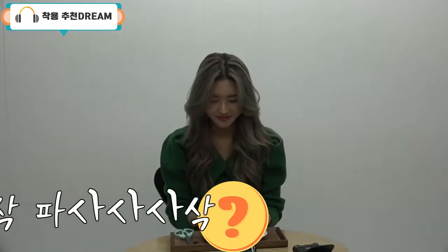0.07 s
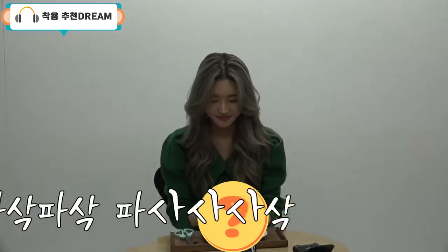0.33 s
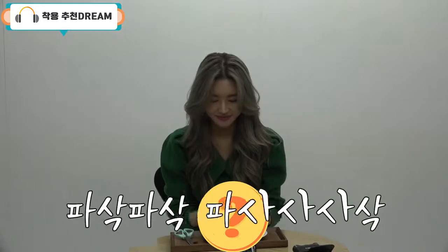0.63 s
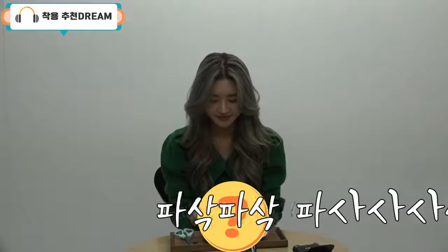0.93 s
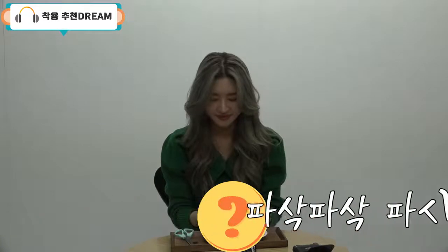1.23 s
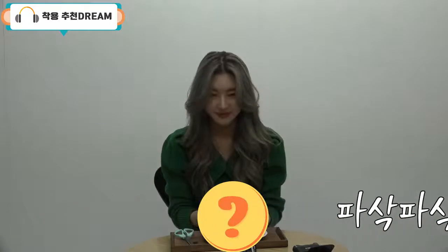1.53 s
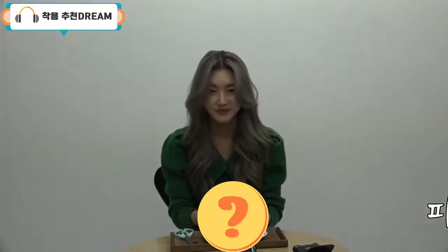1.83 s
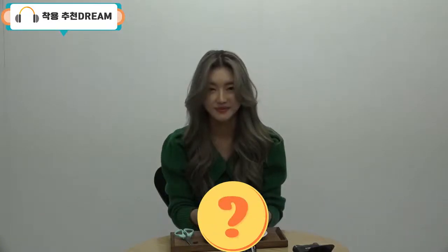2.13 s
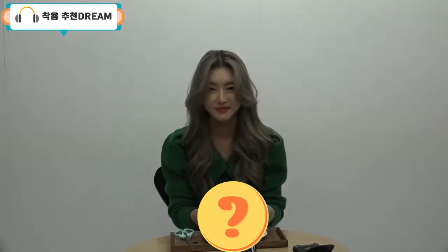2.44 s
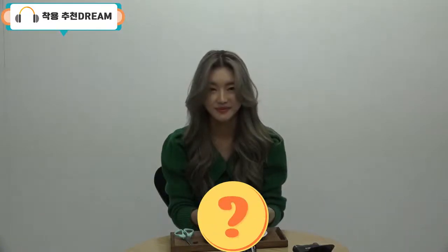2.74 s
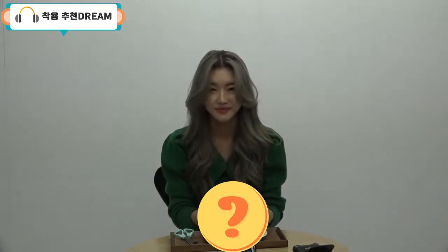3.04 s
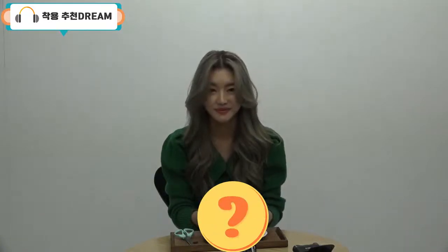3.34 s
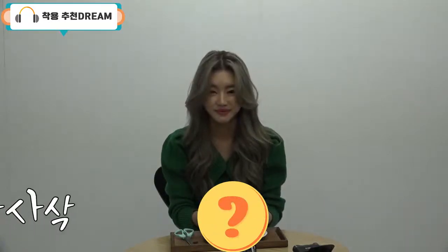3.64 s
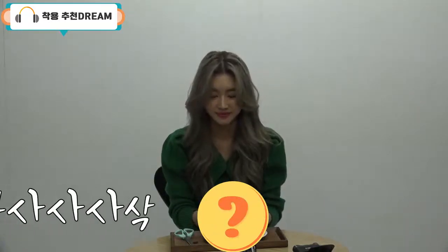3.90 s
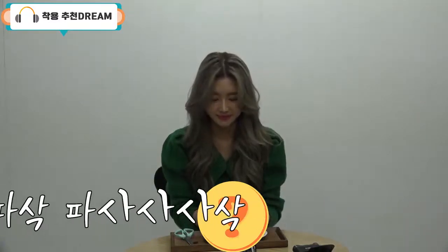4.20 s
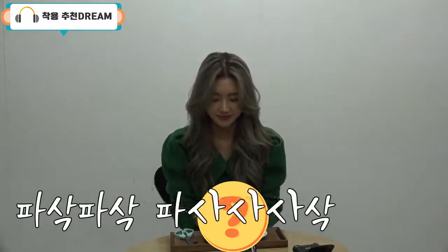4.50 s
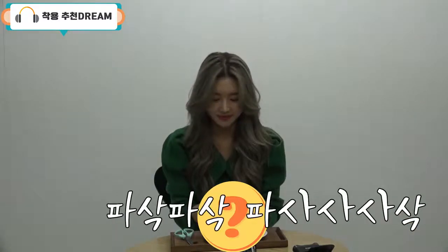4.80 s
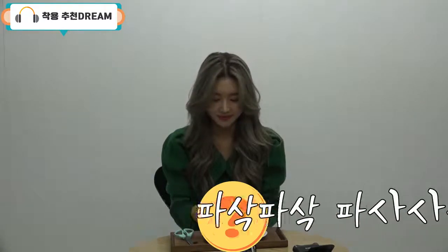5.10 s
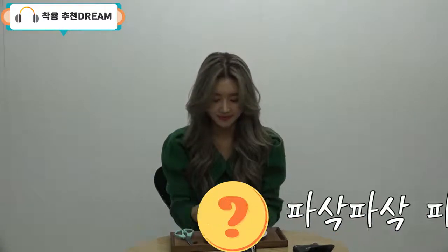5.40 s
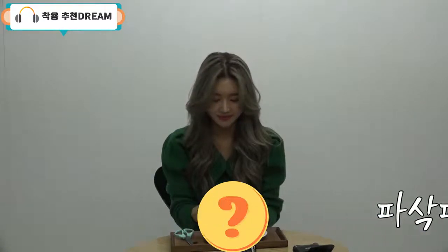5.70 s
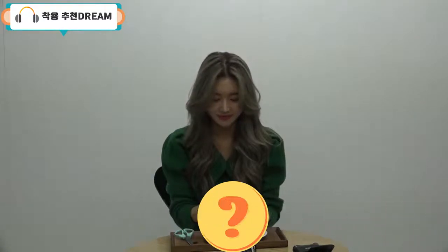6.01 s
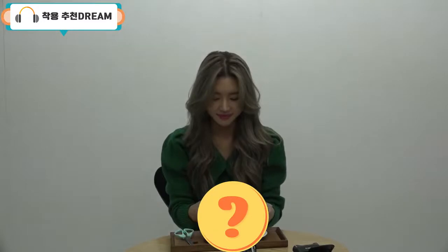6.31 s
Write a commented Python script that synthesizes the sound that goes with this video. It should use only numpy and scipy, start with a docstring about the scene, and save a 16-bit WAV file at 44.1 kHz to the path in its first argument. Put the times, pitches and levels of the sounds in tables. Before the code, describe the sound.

Close to a stereo microphone in a small quiet room, brittle seaweed crackles and snaps as fingers squeeze it again and again. The crunch is busiest at first, eases a little, then picks up again before growing sparser. Beneath it are a soft handling rumble, one faint scuff of a wooden tray on the table early on, and a few low knocks against the tray around the middle.

```python
"""Crushing dry seaweed over a tray

A small quiet room, a stereo microphone close to two hands crushing seaweed sheets over a wooden tray.
Every squeeze breaks thousands of tiny flakes while the sheets rub over each other; bigger fractures
snap out and flex the sheet around them. Hands and sleeves rumble softly as they shift.
Now and then the hands bump the tray and set it ringing, and once it scuffs on the table."""
import sys
import numpy as np
from scipy import signal
from scipy.fft import rfft, irfft
from scipy.io import wavfile
from scipy.ndimage import uniform_filter1d

SR = 44100
rng = np.random.default_rng(int(sys.argv[2]) if len(sys.argv) > 2 else 0)


def transcribe(signal):
    """Save signal, clipped to [-1, 1], as a 16-bit WAV file at the path in sys.argv[1]."""
    frames = np.atleast_2d(signal).T
    limited = np.clip(frames, -1, 1)
    pcm = np.round(limited * 32767).astype(np.int16)
    wavfile.write(sys.argv[1], SR, pcm)


N = 280035
TIME = np.arange(N) / SR
TAPS = 512  # samples in one click
CLICK_HZ, SCENE_HZ = np.fft.rfftfreq(TAPS, 1 / SR), np.fft.rfftfreq(N, 1 / SR)
FLEX_HZ, EDGE_HZ, TOP_HZ = 3000, 7000, 16000  # upper ends of sheet flex, torn edge and crisp treble
LEAD_S = .002  # a crack creaks this long before it breaks

# Levels in the tables are relative; each source adds its own gain.
# air of the quiet room: f/Hz, level/dB
ROOM_COLOUR = [(20, 12), (120, 7), (500, -22), (2000, -42), (9000, 12), (16000, -31)]
# rumble of hands and sleeves: f/Hz, level/dB
HAND_COLOUR = [(20, -11), (42, 4), (75, 0.5), (120, 5), (190, 1), (320, -3.5), (550, -8), (1000, -13),
               (2000, -46)]
# hands shifting their hold: middle t/s, level/dB, half-length/s
HAND_SHIFTS = [(0.084, -47, .05), (0.304, -51.5, 0.092), (.76, -53, 0.21), (0.97, -52, 0.047),
               (1.15, -59.5, 0.28), (1.503, -59.5, 0.24), (2.156, -56.5, 0.16), (2.554, -53, 0.11),
               (2.8, -53.5, 0.21), (3.205, -52.5, 0.12), (3.62, -50.5, 0.11), (3.944, -54.5, 0.068),
               (4.17, -52, .08), (4.4, -54, 0.03), (4.94, -49, 0.025), (6.264, -54.5, 0.17)]
# finger squeezes: tightest t/s, treble level/dB, build-up/s, release/s, flex re treble/dB
FINGER_SQUEEZES = [(.03, -41.5, .1, .14, -6.5), (0.288, -33.5, 0.082, .12, -8), (0.599, -42, .12, .1, -6),
                   (.78, -39, .15, .15, -7.5), (.97, -33.5, .15, .14, -9.5), (1.14, -40.5, 0.051, .16, -11),
                   (1.472, -46, .1, .06, -7), (1.56, -42.5, .025, .05, -5.5), (1.64, -44, .04, .05, -5),
                   (1.76, -47.5, .04, 0.11, -5.5), (1.88, -49, .04, 0.073, -16),
                   (2.072, -41.5, .13, .11, -7), (2.209, -43.5, 0.036, .07, -6.5),
                   (2.522, -47, .04, .1, -7.5), (2.69, -44, .03, .1, -12.5), (2.79, -47, .04, .04, -1.5),
                   (2.858, -40.5, .025, 0.029, -5.5), (2.92, -44, .03, .05, -3),
                   (3.068, -44.5, .06, .08, -5), (3.208, -37, .1, .17, -9), (3.41, -42.5, 0.066, 0.12, -9),
                   (3.532, -43, .03, .025, -1), (3.6, -36, .035, .17, -6.5), (3.748, -41, .1, .22, -7),
                   (3.962, -45, .1, .14, -0.5), (4.092, -45, .08, .16, -4), (4.259, -45, .08, .05, -2),
                   (4.419, -42.5, .05, .1, -4.5), (4.54, -43, .07, .03, -7), (4.619, -37.5, .045, .07, -5),
                   (4.781, -39.5, .14, .09, -8.5), (4.94, -39.5, .08, .045, -4.5),
                   (5.05, -41.5, .03, .04, -4), (5.168, -45, .03, .04, -2), (5.252, -46, .04, .06, -8.5),
                   (5.37, -40, .03, .05, -14), (5.43, -38.5, .04, .04, -14), (5.511, -47, 0.046, .05, -18),
                   (5.61, -36.5, .04, .04, -14.5), (5.71, -40.5, .08, .035, -15),
                   (5.916, -50, .018, .025, -12), (6.122, -49, .13, .12, -14),
                   (6.26, -51.5, .06, 0.077, -1)]
# sheets sliding in the loose grip, with a brief rest near the end: t/s, level/dB
GRIP_SLIDE = [(0, -46.5), (1.3, -47), (1.8, -50.5), (2.6, -48.5), (3.5, -46), (4.35, -48.5), (5.7, -49),
              (5.79, -54.5), (5.97, -66), (6.03, -47.5), (6.35, -54)]
# what a breaking sheet radiates: f/Hz, level/dB
SHEET_COLOUR = [(200, 2.5), (600, -3), (830, 1), (1150, -1.5), (1600, 3.5), (2000, 1), (2300, -2),
                (2700, 1), (4700, -5), (7700, 0), (8500, 3.5), (11000, 1), (14000, -2), (16000, -13)]
# treble beamed to the left of the microphone: f/Hz, left minus right/dB
TREBLE_BEAM = [(4000, 0), (5800, 0), (7500, 7.5), (8600, 6.5), (11000, 2.5), (14000, 0.6)]
# big fractures: t/s, treble level/dB, torn edge re treble/dB, flex re treble/dB, ring f/Hz
FRACTURES = [(0.0321, -21.5, -14, -30, 5070), (0.1851, -35, -5, 3.5, 2620),
             (0.2713, -22.5, -12, -5.5, 1500), (0.293, -22.5, -21, -6, 1930), (0.337, -24.5, -9, -21, 5370),
             (0.3852, -34.5, -13, 4.5, 1500), (0.5369, -20, -41, -20, 2770),
             (0.5865, -26.5, -13, -11, 1700), (0.6067, -24, -25, -18, 2600),
             (0.6919, -25.5, -13, -11, 2100), (0.719, -27.5, -3.5, -4, 3770), (0.8149, -25.5, -2, -5, 2800),
             (0.8574, -26, -2, -11, 4240), (0.8867, -23.5, -3, -7.5, 5500), (0.9723, -18, -7, -11.5, 2630),
             (1.0021, -23, -11, -12, 2000), (1.0528, -24.5, -10, -17, 2700), (1.0603, -22.5, -5, -22, 5530),
             (1.1161, -17.5, -8, -10, 4200), (1.187, -27.5, -4, -8, 3900), (1.219, -27, -9, -13, 2700),
             (1.2381, -27, -9, -1, 1620), (1.241, -24.5, -10.5, -16, 1400), (1.3224, -35.5, -2, 3.5, 885),
             (1.451, -32, -6, -21, 5600), (1.476, -26, -8, -1.5, 1580), (1.487, -13.5, -19, -38, 5950),
             (1.534, -33, 0, 2.5, 1600), (1.5487, -21.5, -5.5, -4.5, 2820), (1.6015, -26, -5, -10.5, 3600),
             (1.61, -32.5, -3, -15, 5600), (1.63, -23, -13, -13.5, 2300), (1.7254, -27.5, -1, -8, 5800),
             (1.7614, -30.5, -9, -3.5, 1180), (2.1026, -25, -11.5, -31, 5600), (2.672, -37, -19, -18, 1100),
             (2.7886, -31.5, -21, -13, 2100), (2.9069, -22.5, -12.5, -12, 2600),
             (2.9244, -27, -2.5, -3.5, 2900), (2.9621, -26, -7.5, -12, 3770), (3.1207, -37, 0.5, 6, 2440),
             (3.2675, -31, -12, -4, 1300), (3.2794, -33, -5, -13, 2000), (3.4807, -35, -3.5, -5.5, 6300),
             (3.575, -21.5, -9, -7, 1800), (3.5794, -20, -4.5, -19, 6030), (3.5996, -22.5, -7, -7, 1900),
             (3.6637, -37, -1, 8.5, 1690), (3.7146, -25.5, -6, -4, 1900), (3.7482, -30, 2, -1, 3600),
             (3.7544, -23.5, -2, -12.5, 4200), (3.773, -15.5, -21, -32, 4200), (3.8464, -41.5, 5, 12, 2040),
             (4.0202, -27.5, -8, -4.5, 1600), (4.094, -23, -7, -1.5, 1810), (4.26, -35, -3, -0.5, 1000),
             (4.4008, -31, -7, 2.5, 2700), (4.4815, -28, -6, -1.5, 1600), (4.5505, -23.5, -26, -11, 1900),
             (4.586, -21.5, -4, -4.5, 970), (4.621, -19.5, -15, -9, 1920), (4.6606, -34, -26, 0, 1500),
             (4.8217, -33, -9, -11, 2600), (4.9106, -25, -16, -7, 2700), (4.9475, -18, -22, -12.5, 2800),
             (4.9547, -24, -21, -20, 1500), (4.9644, -20.5, -11, -35, 5150), (5.035, -20.5, -28, -16, 1900),
             (5.048, -18.5, -14.5, -18, 3570), (5.0533, -19.5, -20, -34, 5700),
             (5.1312, -33.5, -14, -7, 2500), (5.1603, -27.5, -5, -3, 1310), (5.2524, -36.5, -10, -19, 6300),
             (5.343, -22.5, -18, -6, 1510), (5.3645, -28, -9, -13, 6400), (5.3706, -24, -12, -7, 1820),
             (5.4181, -23.5, -12, -26, 1500), (5.4298, -20.5, -12, -10.5, 1400),
             (5.4853, -27.5, -11, -16, 5700), (5.5002, -23, -12.5, -24, 4000),
             (5.5272, -23.5, -18, -29, 6200), (5.6063, -24, -4, -5.5, 1400),
             (5.6098, -21.5, -21, -11, 4200), (5.7166, -19, -10, -40, 4100), (5.7207, -16, -6.5, -14, 4280),
             (5.8325, -34.5, -7, -11, 1400), (5.891, -28.5, -11.5, -5, 1780), (6.0742, -51, -22, 12, 1360),
             (6.1346, -25, -15, -12.5, 1260), (6.2571, -31.5, -14, -9, 1700)]
# hands knocking the tray: t/s, level/dB
TRAY_BUMPS = [(0.058, -48.5), (0.26, -45), (2.193, -51), (2.334, -40), (2.463, -40.5), (2.505, -37.5),
              (2.535, -41), (3.121, -44), (4.022, -35.5), (4.065, -39), (4.1, -38.5), (4.586, -51),
              (4.923, -49), (6.064, -51)]
# resonances of tray and table: f/Hz, level/dB, t60/s
TRAY_MODES = [(44.7, -8, 0.56), (109, 6, 0.25), (184.8, 6.5, 0.19), (243.4, -1, 0.28), (281, 10, 0.062),
              (467, -5.5, 0.145)]


def undb(db):
    """Decibels to gain."""
    return 10 ** (np.asarray(db) / 20)


def together(a_db, b_db):
    """Level of two unrelated sounds heard at once."""
    return 20 * np.log10(np.hypot(undb(a_db), undb(b_db)))


def unit(x):
    """Scale to rms 1."""
    return x / np.sqrt(np.mean(x ** 2))


def steady(x):
    """Even out the power over about 60 ms and keep the faster grain."""
    return x / np.sqrt(uniform_filter1d(np.mean(x ** 2, 0), size=2600) + 1e-9)


def colour(points, hz):
    """Read (f/Hz, level/dB) points on a log-frequency axis."""
    f, db = np.transpose(points)
    return np.interp(np.log(hz + 1), np.log(f), db)


def band(x, hz, kind):
    """Gentle Butterworth filter."""
    return signal.sosfilt(signal.butter(2, hz, kind, fs=SR, output="sos"), x)


def add(out, s, sound):
    """Mix a short stereo sound in at s seconds."""
    i = max(int(s * SR), 0)
    out[:, i:i + sound.shape[1]] += sound[:, :max(N - i, 0)]


def ripple(width_hz):
    """Random peaks and dips along frequency."""
    knots = np.arange(80)
    return 0.93 * np.interp(CLICK_HZ / width_hz, knots, rng.standard_normal(len(knots)))


def noise(points, opposed, opposed_hz=70):
    """Coloured stereo noise, its sides unrelated above the deep bass and partly opposed within it."""
    against = opposed / (1 + (SCENE_HZ / opposed_hz) ** 3)
    spectra = rfft(rng.standard_normal((2, N))) * undb(colour(points, SCENE_HZ))
    mid, side = spectra * np.sqrt([1 - against, 1 + against])
    return unit(irfft([mid + side, mid - side], N))


def room_tone(db=-69):
    """The quiet room: a steady low rumble and a faint hiss."""
    return undb(db) * noise(ROOM_COLOUR, opposed=0.2)


def handling(rest_db=-60, left_db=-2):
    """Soft rumble of hands and sleeves near the microphone, swelling whenever they shift."""
    power = undb(rest_db) ** 2
    for s, db, half_s in HAND_SHIFTS:
        power = power + undb(db) ** 2 * np.exp(-np.minimum(((TIME - s) / half_s) ** 2, 20))
    return noise(HAND_COLOUR, opposed=0.37) * np.sqrt(power) * undb([[left_db], [0]])


def squeezing(fall_db=10.5, roundness=1.35):
    """Treble and flex level/dB of the breaking flakes: each squeeze swells to its peak and lets go."""
    treble, flex = 1e-9, 1e-9
    for s, db, build_s, release_s, flex_db in FINGER_SQUEEZES:
        from_peak = np.maximum((s - TIME) / build_s, (TIME - s) / release_s)
        power = undb(db - fall_db * np.minimum(from_peak, 4) ** roundness) ** 2
        treble = treble + power
        flex = flex + power * undb(flex_db) ** 2
    return 10 * np.log10(treble), 10 * np.log10(flex)


def flake(ring_db, ring_hz=520, scatter_db=3.5):
    """Gain over frequency of one flake: its own resonances, and treble reaching each side unequally."""
    db = colour(SHEET_COLOUR, CLICK_HZ) + ring_db * ripple(ring_hz)
    directivity = np.clip((CLICK_HZ - 3300) / 1400, .12, 1)
    side_db = colour(TREBLE_BEAM, CLICK_HZ) / 2 + scatter_db * directivity * ripple(width_hz=855)
    return undb(db + np.array([side_db, -side_db]))


def tear(run_s, slip, creak, count=5):
    """Spectrum of a running crack: faint creaks, the break itself at LEAD_S, then a few slips."""
    after_s, creak_s = rng.exponential(run_s, count), LEAD_S * rng.random(count)
    slips = slip * rng.standard_normal(count) * np.exp(-after_s / (2 * run_s))
    creaks = creak * rng.standard_normal(count)
    times = np.r_[LEAD_S, LEAD_S + after_s, creak_s]
    return np.r_[1, slips, creaks] @ np.exp(-2j * np.pi * np.outer(times, CLICK_HZ))


def click(gain, crack):
    """A crack excites a flake: each impulse starts suddenly and rings briefly (minimum phase)."""
    cepstrum = irfft(np.log(gain + 1e-9))
    cepstrum[:, 1:TAPS // 2] *= 2
    cepstrum[:, TAPS // 2 + 1:] = 0
    return irfft(np.exp(rfft(cepstrum)) * crack)


def breaks(per_s, spread_db, cap_db, bunch_db, ring_db, breadth_db, slip, count=120):
    """Countless small breaks of a set of flakes, coming in bunches at an even overall level."""
    lows = 1 / (1 + (CLICK_HZ / FLEX_HZ) ** 3)
    clicks = []
    for _ in range(count):
        # broad flakes pop, narrow ones tick
        gain = flake(ring_db) * undb(breadth_db * rng.standard_normal() * lows)
        clicks.append(unit(click(gain, tear(run_s=0.000601, slip=slip, creak=slip / 2))))
    bunching = undb(bunch_db * unit(band(rng.standard_normal(N), 56.5, "low")))
    size_db = np.minimum(spread_db * rng.exponential(size=N), cap_db)  # few large, many tiny
    size = bunching * undb(size_db) * rng.choice([-1, 1], N)
    which = rng.integers(0, count, N)
    out = np.zeros((2, N))
    for i in np.flatnonzero(rng.random(N) < per_s / SR):
        add(out, i / SR - LEAD_S, size[i] * clicks[which[i]])
    return steady(out)


def voiced(grain, treble, flex, treble_db, edge_db, flex_db, edge_share=0.13):
    """Level three bands: broad pieces flex and sound low, crumbs give treble, torn edges lie between."""
    lows = 1 / (1 + (SCENE_HZ / FLEX_HZ) ** 10)
    highs = 1 - 1 / (1 + (SCENE_HZ / EDGE_HZ) ** 10)
    edge = treble + edge_share * (flex - treble)
    zones = [(lows, flex + flex_db), (1 - lows - highs, edge + edge_db), (highs, treble + treble_db)]
    spectrum = rfft(grain)
    return sum(undb(db) * steady(irfft(spectrum * share, N)) for share, db in zones)


def crackle(treble, flex, per_s=2100, at_db=-44, follow=0.8, thin_db_per_s=1.17):
    """Flakes break faster in a hard squeeze, and more sparsely as the sheets are used up."""
    rate = per_s * undb(follow * (treble - at_db) - thin_db_per_s * (TIME - TIME.mean()))
    grain = breaks(rate, spread_db=6, cap_db=19.5, bunch_db=2, ring_db=6.5, breadth_db=9.5, slip=0.35)
    return voiced(grain, treble, flex, treble_db=-1.2, edge_db=-8.5, flex_db=-2)


def rubbing(treble, flex, squeeze_treble_db=-5, squeeze_flex_db=-2.5, grip_flex_db=-10.5):
    """Sheets slide over each other with a finer grain, in the loose grip and with every squeeze."""
    grain = breaks(per_s=7000, spread_db=0, cap_db=13.5, bunch_db=3, ring_db=2, breadth_db=-2, slip=0.91)
    grip = np.interp(TIME, *np.transpose(GRIP_SLIDE))
    rub_treble = together(grip, treble + squeeze_treble_db)
    rub_flex = together(grip + grip_flex_db, flex + squeeze_flex_db)
    return voiced(grain, rub_treble, rub_flex, treble_db=-7.4, edge_db=-12, flex_db=0)


def crumbs(treble_db=-19, flex_db=-16, before_s=.0025, after_s=0.0059):
    """Treble and flex level/dB of flakes that give way before a big fracture and shower out after it."""
    t = np.arange(-SR // 20, SR // 10) / SR
    shower = np.exp(np.minimum(t / before_s, -t / after_s))
    power = np.full((2, N), 1e-9)
    for s, db, _, flex, _ in FRACTURES:
        peak = undb([[db + treble_db], [db + flex + flex_db]]) ** 2
        add(power, s + t[0], peak * shower[t >= -s])
    return 10 * np.log10(power)


def snaps(rows, piece_hz=700, bass_hz=150, ring_db=6, ring_per_flex=0.084, ring_width_hz=480):
    """Each fracture rings its own piece of sheet, more so the more it flexes."""
    out = np.zeros((2, N))
    zone = np.digitize(CLICK_HZ, [FLEX_HZ, EDGE_HZ])
    centres_hz = [2000, 5000, 8500]  # flex, torn edge, treble
    # a small piece radiates little bass
    bass_loss = (CLICK_HZ ** 2 + bass_hz ** 2) / (CLICK_HZ ** 2 + piece_hz ** 2)
    for s, db, edge, flex, hz in rows:
        resonance = np.exp(-((CLICK_HZ - hz) / ring_width_hz) ** 2)
        ring = undb((ring_db + ring_per_flex * (flex + 24)) * resonance)
        gain = flake(ring_db=-2) * bass_loss * ring
        crack = tear(run_s=0.000797, slip=0.64, creak=0.032)
        wanted = undb(db + np.array([flex, edge, 0]))
        for _ in range(3):  # bend the colour smoothly until each zone carries its share
            energy = np.mean(np.abs(gain * crack) ** 2, 0) * (CLICK_HZ < TOP_HZ)
            power = np.bincount(zone, energy) * 2 / (TAPS * SR * .001)  # spread over 1 ms
            gain = gain * np.exp(np.interp(CLICK_HZ, centres_hz, np.log(wanted / np.sqrt(power))))
        add(out, s - LEAD_S, click(gain, crack))
    return out


def lesser_fractures(treble, db=-31.5, follow=0.68, scatter_db=4, edge_db=-11, flex_db=-11,
                     flex_scatter_db=5, low_hz=1300, high_hz=6300, count=45):
    """Chance rows like FRACTURES, likelier and louder in a hard squeeze."""
    strain = np.cumsum(undb(treble / 2))
    when, size, force = rng.uniform(-1, 1, (count, 3)).T
    at = np.searchsorted(strain, strain[-1] * (when + 1) / 2)
    level = db + follow * (treble[at] - np.median(treble)) + scatter_db * force
    flex = flex_db + flex_scatter_db * size  # small pieces flex less and ring higher
    ring_hz = low_hz * (high_hz / low_hz) ** ((1 - size) / 2)
    return list(zip(at / SR, level, np.full(count, edge_db), flex, ring_hz))


def tray_bumps(push_s=0.0067, apart_rad=0.73, left_db=-3, bump_db=-4, jolt_db=8, jolt_s=0.0041):
    """Soft blows ring the tray; the shaking table moves the sides out of step, jolting the right most."""
    t, ring = TIME[:SR // 2], 0
    for hz, db, t60 in TRAY_MODES:
        phase = apart_rad * np.sqrt(150 / hz) * np.array([[1], [-1]])
        ring = ring + undb(db) * np.exp(-np.log(1000) * t / t60) * np.sin(2 * np.pi * hz * t + phase)
    jolt = undb(jolt_db) * np.exp(-(2 * (t / jolt_s - 1)) ** 2) * np.array([[.3], [-1]])
    blow = (ring * undb([[left_db], [0]]) + jolt) * (1 - np.exp(-t / push_s))
    out = np.zeros((2, N))
    for s, db in TRAY_BUMPS:
        add(out, s, blow * undb(db + bump_db))
    return out


def tray_scuff(low_hz=370, high_hz=610, db=-46):
    """The tray slips a little on the table: a short hollow rub."""
    rub = band(rng.standard_normal(N), [low_hz, high_hz], "band")
    gate = np.interp(TIME, [.626, .635, .668, .695], [0, 1, .8, 0])
    return undb(db) * gate * rub / np.sqrt(np.average(rub ** 2, weights=gate))


def room(x, t60=0.02, tail_db=-15, width=0.36, treble_width=0.24, wall_s=0.013, wall_db=-22):
    """The small room: a faint short tail, widest in the treble, and one echo off a near wall."""
    t = TIME[:SR // 3]
    mid, side = rng.standard_normal((2, len(t))) * np.exp(-np.log(1000) * t / t60) * (t > .002)
    side = width * side + treble_width * band(side, 6000, "high")
    tail = np.array([mid + side, mid - side]) * undb(tail_db) / np.sqrt(np.sum(mid ** 2))
    tail[:, int(wall_s * SR)] += undb(wall_db)
    return x + signal.oaconvolve(x, tail, axes=1)[:, :N]


def scene(sheet_db=-0.5, low_cut_hz=318):
    """Sheets and tray at close range, over handling rumble and room tone."""
    squeeze_treble, squeeze_flex = squeezing()
    treble, flex = together([squeeze_treble, squeeze_flex], crumbs())
    crunch = band(crackle(treble, flex) + rubbing(treble, flex), low_cut_hz, "high")
    sheets = crunch + snaps(FRACTURES + lesser_fractures(squeeze_treble))
    return room(undb(sheet_db) * sheets + tray_scuff()) + tray_bumps() + handling() + room_tone()


def record(dry, port_hz=6800, port_width_hz=1000, lag_rad=0.26):
    """Stereo microphone: the right port lags around its resonance, and the recorder cuts the top."""
    lag = lag_rad * np.exp(-((SCENE_HZ - port_hz) / port_width_hz) ** 2)
    right = irfft(rfft(dry[1]) * np.exp(-1j * lag), N)
    top_cut = signal.ellip(8, .2, 70, TOP_HZ, fs=SR, output="sos")
    return signal.sosfilt(top_cut, np.array([dry[0], right]))


dry = scene()
out = record(dry)
transcribe(out)
```